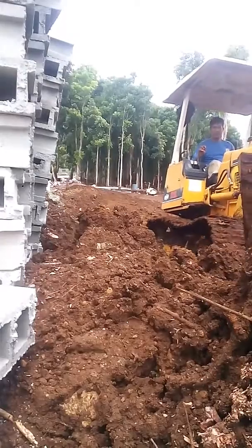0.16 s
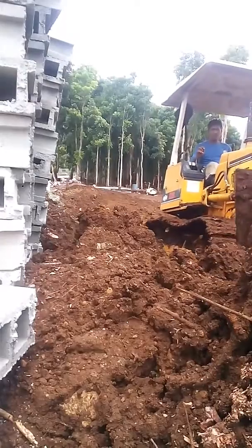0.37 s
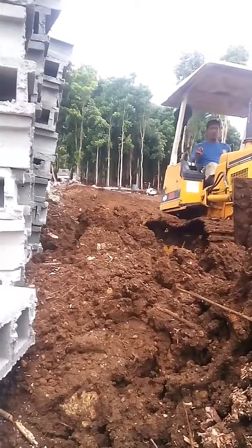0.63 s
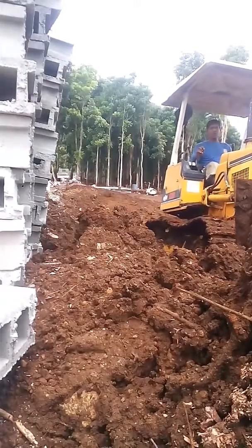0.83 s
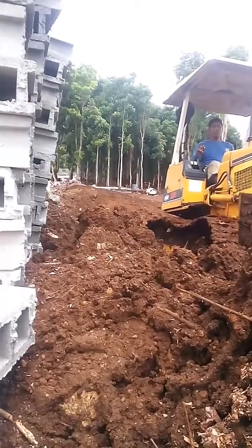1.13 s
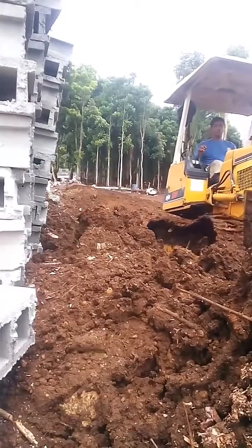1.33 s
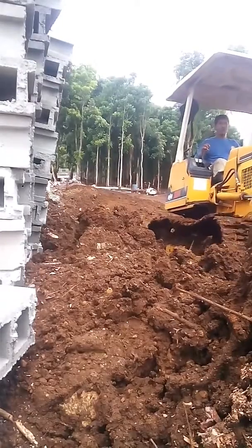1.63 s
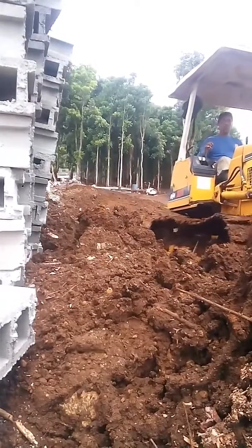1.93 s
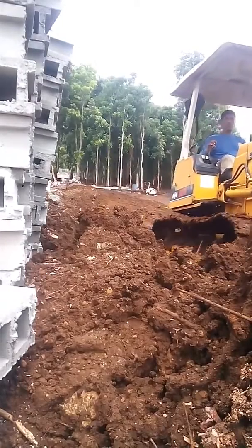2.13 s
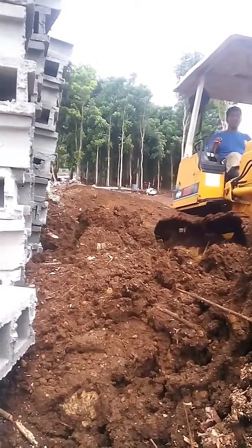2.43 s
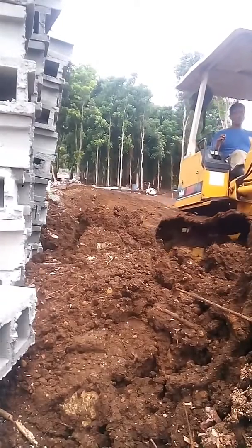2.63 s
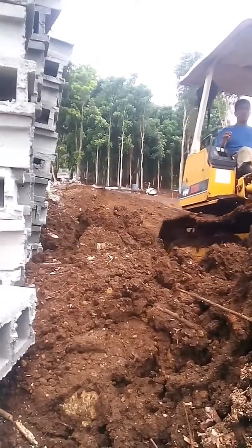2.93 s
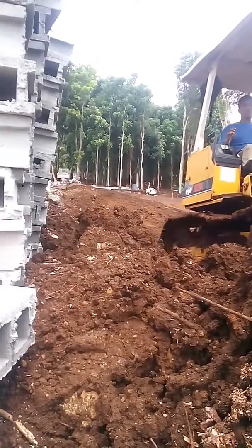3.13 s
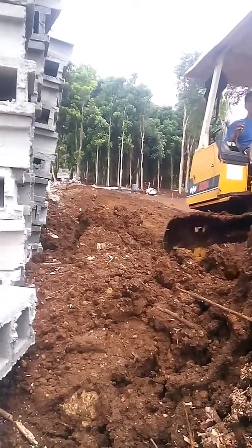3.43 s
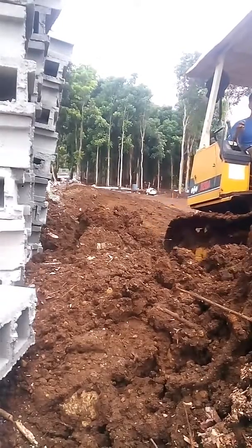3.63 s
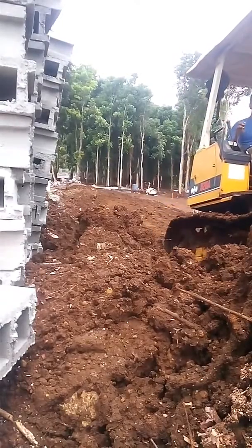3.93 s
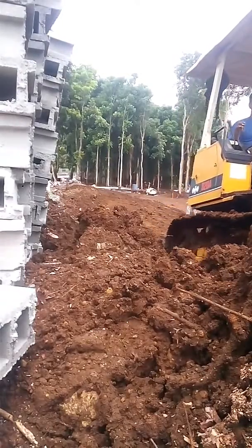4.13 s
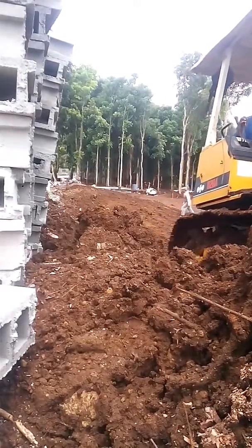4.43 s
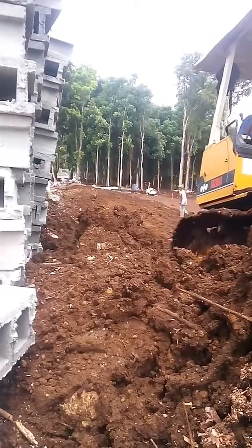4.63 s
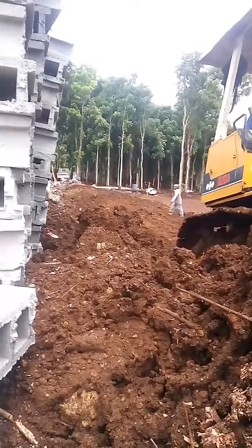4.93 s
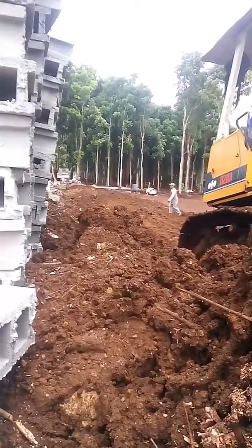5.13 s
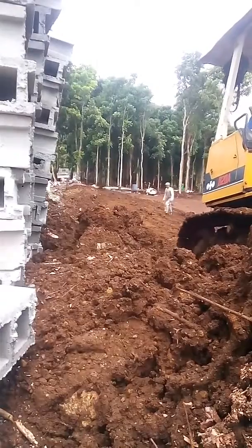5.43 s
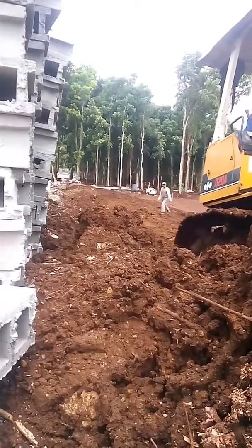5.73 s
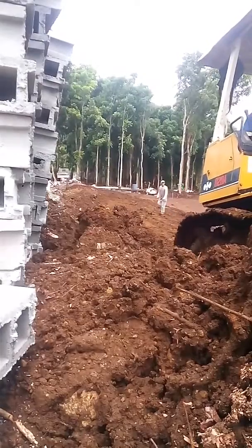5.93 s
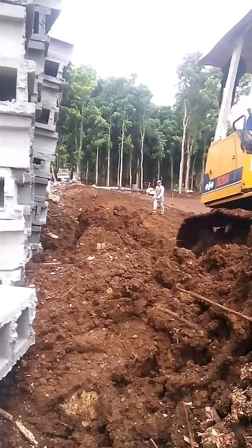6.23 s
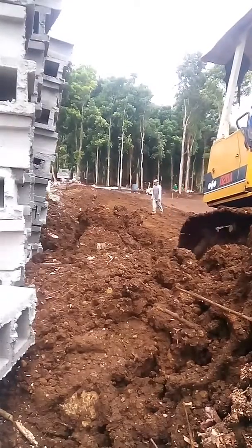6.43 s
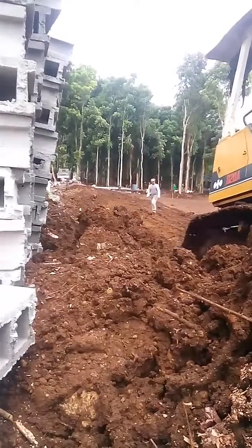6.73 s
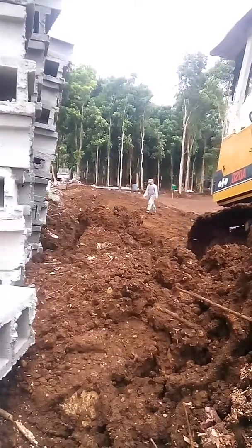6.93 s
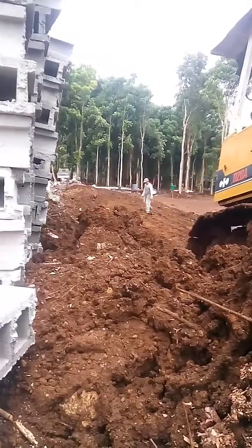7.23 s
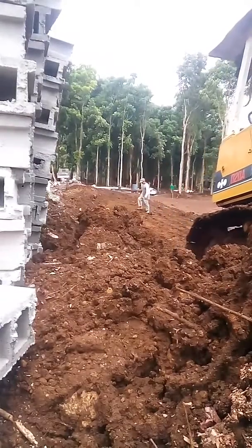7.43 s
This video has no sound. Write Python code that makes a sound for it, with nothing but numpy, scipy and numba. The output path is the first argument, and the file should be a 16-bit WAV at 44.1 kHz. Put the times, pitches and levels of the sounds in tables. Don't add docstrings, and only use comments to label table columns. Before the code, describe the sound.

Outdoors, a few metres from the microphone, a small four-cylinder crawler diesel runs without pause. A low throbbing exhaust with an uneven lope sits under knocking, rattling metal clatter. It backs closer, getting louder and brighter with more fan hiss, sagging slightly as soil loads the blade. A tight cluster of track clanks comes just before five seconds.

```python
import sys
import numpy as np
from scipy import signal
from scipy.fft import rfft, irfft, next_fast_len
from scipy.io import wavfile
from scipy.ndimage import uniform_filter1d
from numba import njit

SR = 44100
rng = np.random.default_rng(int(sys.argv[2]) if len(sys.argv) > 2 else 0)


def to_wav(s):
    ch = np.atleast_2d(s).T
    pcm = np.round(np.clip(ch, -1, 1) * 32767)
    wavfile.write(sys.argv[1], SR, pcm.astype(np.int16))


def magnitude_from_level(level_db):
    exponent = np.asarray(level_db, float) / 20
    return 10 ** exponent


N = 333837

# (time [s], firing rate [1/s])
FIRING_RATE = [(0.0, 54.88), (0.5, 54.93), (0.8, 51.26), (1.18, 53.13), (2.0, 51.28), (2.7, 52.33),
               (3.4, 51.74), (3.96, 54.94), (4.06, 54.26), (4.4, 48.84), (4.94, 53.49), (5.54, 52.64),
               (5.9, 55.31), (6.27, 50.51), (7.15, 51.87), (7.57, 57.0)]
# (time [s], effort [0-1])
EFFORT = [(0, 0.37), (.4, 0.21), (.9, 0.2), (1.6, 0.6), (2.05, 0.56), (2.4, 0.78), (2.6, 0.64), (3.1, 0.7),
          (3.5, 0.82), (4.2, 0.24), (4.5, 0.84), (4.88, 1.05), (5.06, 0.36), (5.35, 0.83), (6.02, 0.08),
          (6.5, 0.72), (6.95, 0.92), (7.57, 0.08)]
# (time [s], nearness [0-1], facing of the grille [0-1])
APPROACH = [(0, 0, .01), (1.2, 0.06, 0), (2.3, 0.31, 0), (3.3, 0.32, 0.38), (3.9, 0.39, 0.84),
            (4.6, 0.81, .9), (5.3, 0.96, 1), (6.4, 0.78, 1), (7.57, 1, 1)]
# (far and idle [dB], full effort [dB], near [dB], full strain [dB], speed [dB per firing/s])
EXHAUST_LAWS = [
    (-35, 2.5, 3.5, 2.5, 0.64),
    (-40.5, 2, 4.5, 4, 0.22),
    (-47, 17.5, 0.5, 1.8, -1),
    (-42.5, -0.5, 4.5, 1.5, 0.36),
]
USUAL_RATE = 51.5
LOUD_CYLINDER = 0.525


def unit(x):
    return x / np.sqrt(np.mean(x ** 2))


def curves(table):
    s, *columns = np.transpose(table)
    return [np.interp(np.arange(N) / SR, s, c) for c in columns]


def coloured(x, spectrum):
    hz, db = np.transpose(spectrum)
    size = next_fast_len(N)
    f = np.arange(size // 2 + 1) * SR / size + 1
    gain = magnitude_from_level(np.interp(np.log(f), np.log(hz), db))
    return unit(irfft(rfft(x, size) * gain, size)[:N])


def walk(rate):
    k = int(SR / rate)
    held = np.repeat(rng.standard_normal(N // k + 1), k)
    return unit(uniform_filter1d(uniform_filter1d(held, k), k)[:N])


@njit
def svf(x, hz, width):
    y, b, l = np.empty(len(x)), 0., 0.
    for i in range(len(x)):
        g, k = np.tan(np.pi * hz[i] / SR), width / hz[i]
        v = (b + g * (x[i] - l)) / (1 + g * (g + k))
        b, l, y[i] = 2 * v - b, l + 2 * g * v, k * v
    return y


def ring(x, modes, steep=False):
    out = 0
    for k, (hz, width, db) in enumerate(modes):
        centre = np.full(N, 1. * hz)
        y = svf(x, centre, 1. * width)
        if steep:
            y = svf(y, centre, 1. * width)
        out = out + (-1) ** k * magnitude_from_level(db) * y
    return out


def bite():
    # (time of the break [s], build-up [s], sag [firings/s])
    bites = [
        (0.93, 0.08, 0.35),
        (1.5, 0.5, 2.21),
        (2.36, 0.37, 1.67),
        (2.87, 0.5, 1.06),
        (3.36, 0.31, 1.08),
        (4.84, 0.35, 3.37),
        (5.31, 0.49, 3.06),
        (6.88, 0.15, 1.12),
    ]
    t = np.arange(N) / SR
    release = 0.08
    return sum(sag * np.interp(t, [s - length, s, s + release], [0, 1, 0]) for s, length, sag in bites)


def strain():
    lag = 0.055
    drag = bite()
    return np.roll(drag / drag.max(), int(lag * SR)) ** 2


def lugging():
    return np.clip(50.3 - curves(FIRING_RATE)[0] + bite(), 0, 1)


def levels(laws, third):
    effort, near = curves(EFFORT)[0], curves(APPROACH)[0]
    fast = curves(FIRING_RATE)[0] - bite() - USUAL_RATE
    return [far_db + effort_db * effort + near_db * near + third_db * third + fast_db * fast
            for far_db, effort_db, near_db, third_db, fast_db in laws]


def exhaust(cycles, rate):
    # (multiple of the firing rate, level [dB], lead [rad], turn of lead [rad/Hz])
    beat_orders = [(1, -17, -.1, 0), (4, 1, -2.4, -1), (5, -4, 2.9, -.55), (6, -11, -.4, -.4),
                   (8, -22, 2.0, 0), (9, -26, 1.0, 0), (12, -20, 0, 0)]
    # (frequency [Hz], level [dB])
    lope_spectrum = [(25, -43), (65, -9), (78, -32), (90, 4.5), (125, 7), (165, -2.5), (182, 8),
                     (200, -4.5), (250, -7.5), (330, -16.5), (385, -20.5), (450, -22), (480, -29)]
    # (frequency [Hz], level [dB])
    roar_spectrum = [(20, -80), (60, -30), (95, -16), (130, -4), (200, 0), (280, -5), (330, -14),
                     (400, -30), (1000, -100)]
    tone_db, second_db, bark_db, lope_db = levels(EXHAUST_LAWS, strain())
    overrun = np.clip(rate - 52.35, 0, None) * (1 - 0.49 * curves(APPROACH)[0])
    tone_db = tone_db - 2.5 * overrun
    second_db = second_db + 0.5 * overrun + 5 * lugging()
    upper_db = 10.5 * (curves(EFFORT)[0] - .5)
    slip = rate - USUAL_RATE

    firing = 8 * np.pi * cycles
    low = np.cos(2 * firing)
    second = np.cos(3 * firing + 2.6 - .75 * slip) * magnitude_from_level(.8 * walk(14))
    bark = sum(magnitude_from_level(db + 0.83 * walk(18)) * np.cos(k * firing + lead + turn * slip)
               for k, db, lead, turn in beat_orders)

    hz, db = np.transpose(lope_spectrum)
    wobble = [walk(5.3) for _ in range(3)]
    puff = 2 * np.pi * (cycles - LOUD_CYLINDER)
    lope = 0
    for n in range(2, 38):
        if n % 4 == 0:
            continue
        order_hz = n * 12.9
        order_db = np.interp(order_hz, hz, db) + upper_db * (order_hz > 160) + 1.1 * wobble[n % 3]
        pipe_lag = 1.75 * np.exp(-((order_hz - 163) / 19) ** 2)
        turn = .028 * n * (n > 10) * slip
        lope = lope + magnitude_from_level(order_db) * np.cos(n * puff - pipe_lag - turn + .28 * wobble[n % 2])

    roar = coloured(rng.standard_normal(N), roar_spectrum) * magnitude_from_level(1.8 * walk(11) + 1.1 * upper_db)
    tones = magnitude_from_level(tone_db) * unit(low) + magnitude_from_level(second_db) * unit(second) + magnitude_from_level(bark_db - 4.5) * unit(bark)
    return tones + magnitude_from_level(lope_db) * (magnitude_from_level(2.0) * unit(lope) + magnitude_from_level(-5.5) * roar)


def repeating(cycles, size=4096):
    a, b = rng.standard_normal((2, size))[:, (cycles % 1 * size).astype(int)]
    blend = 1.37 * walk(1.477)
    return unit(a * np.cos(blend) + b * np.sin(blend))


def block(cycles):
    # (far and idle [dB], full effort [dB], near [dB], facing [dB], speed [dB per firing/s])
    block_laws = [
        (-47.5, 4, 6, .1, 0.27),
        (-49, 1.2, 5.4, .1, .1),
        (-75, 4.2, 7.5, 4.46, .1),
        (-93.5, 2.5, 3, 22, .1),
    ]
    knock_db = [1.5, -6.5, -3.5, -4.5]
    # (frequency [Hz], level [dB])
    casting_spectrum = [(160, -5), (280, -10.5), (339, -13.5), (378, -4), (579, -4.5), (861, -2.5),
                        (1300, -13.5), (1710, -8), (2100, -17.5), (2760, -8), (3300, -15.5), (4340, -20),
                        (5180, -27), (6630, -26), (7400, -80), (9620, -67), (16300, -120)]
    # (frequency [Hz], width [Hz], level [dB])
    panel_modes = [(457, 36, 2), (588, 39, -6), (1142, 150, -6.5), (4260, 910, -14.5), (5745, 360, -16),
                   (6630, 110, -16)]
    # (place in the cycle [0-1], frequency [Hz], width [Hz], level [dB])
    valve_ticks = [(.2, 1850, 88, -13.5), (0.93, 5670, 800, -20.5), (.72, 2500, 160, -13.5)]
    # (frequency [Hz], level [dB])
    hiss_spectrum = [(4000, -92), (6600, -17), (7000, -8.5), (7300, -16), (7750, -12.5), (8200, -10.5),
                     (9070, -9.5), (10900, -6), (12000, -9), (12800, -15), (14000, -32), (16000, -62)]
    # (frequency [Hz], level [dB])
    top_spectrum = [(8000, -92), (11000, -39), (12400, -6), (13000, -7), (14000, -1), (14900, -6),
                    (15250, -9), (15650, -15), (15800, -56)]
    effort, facing = curves(EFFORT)[0], curves(APPROACH)[1]
    heave_db = 2 * effort ** 3 * np.cos(2 * np.pi * (cycles - LOUD_CYLINDER))
    clatter_db, cover_db, fan_db, top_db = levels(block_laws, facing) + heave_db

    firings = 4 * cycles + 4.19
    count, since = firings.astype(int), firings % 1
    scatter_db = 1.5 * rng.standard_normal(count[-1] + 1)[count]
    strength = magnitude_from_level(np.array(knock_db)[count % 4] + scatter_db)
    gate = 0.72 + strength * (since / 0.14) * np.exp(1 - since / 0.14) * 0.34
    knock = [unit(gate * rng.standard_normal(N)) for _ in range(5)]
    gear = gate * repeating(cycles)

    casting = coloured(knock[0] + 0.53 * gear, casting_spectrum) * magnitude_from_level(0.46 * walk(12))
    panels = sum(ring(knock[1] + 0.72 * gear, [mode], steep=True) * magnitude_from_level(1.7 * walk(5))
                 for mode in panel_modes)
    ticks = 0
    for place, hz, width, db in valve_ticks:
        burst = np.exp(-((cycles - place) % 1) / 0.067) * magnitude_from_level(1.4 * walk(12)) * rng.standard_normal(N)
        ticks = ticks + magnitude_from_level(db) * unit(ring(burst, [(hz, width, 0)], steep=True))
    clatter = magnitude_from_level(-1.5) * casting + magnitude_from_level(-14) * unit(panels) + magnitude_from_level(-9.5) * ticks

    cover_hz = 2667 + 80 * facing + 55.3 * 4 * strain() * effort ** 2 + 30 * walk(7)
    cover = svf(svf(knock[2] + 0.28 * gear, cover_hz, 460.0), cover_hz, 460.0)
    cover = unit(cover) * magnitude_from_level(1.8 * walk(7.9))

    jolt = walk(16)
    fan = magnitude_from_level(fan_db + 1.0 * jolt) * coloured(knock[3], hiss_spectrum)
    fan = fan + magnitude_from_level(top_db + 1.1 * jolt + 1.3 * walk(22)) * coloured(knock[4], top_spectrum)
    return magnitude_from_level(clatter_db) * clatter + magnitude_from_level(cover_db - 3.0) * cover + fan


def body(cycles):
    # (far and idle [dB], full effort [dB], near [dB], facing [dB], speed [dB per firing/s])
    body_laws = [
        (-58, 3.43, 5.2, 7.4, 0.71),
        (-56, 1.4, 3.8, 4.2, 0.2),
        (-55.5, 2, 0.53, .1, .1),
    ]
    effort, facing = curves(EFFORT)[0], curves(APPROACH)[1]
    hood_db, side_db, grille_db = (db + 1.4 * walk(9) for db in levels(body_laws, facing))
    hood_db = hood_db + 6 * lugging() * effort ** 2
    hood_hz, side_hz, grille_hz = (hz * (1 + 0.011 * walk(5)) for hz in (385.4, 866, 1807 - 90 * facing))
    shake = repeating(cycles) + 0.44 * rng.standard_normal(N)

    frame = unit(ring(shake, [(520, 100, 0)], steep=True))
    labour = uniform_filter1d(lugging(), size=SR // 6, origin=SR // 14) * effort ** 3
    pulse = 1 + 0.56 * np.cos(2 * np.pi * (cycles - LOUD_CYLINDER))
    out = magnitude_from_level(-44.5) * labour * pulse * frame
    for db, hz, width in ((hood_db - 4, hood_hz, 40.), (side_db - 3, side_hz, 100.),
                          (grille_db - 5, grille_hz, 220.)):
        out = out + magnitude_from_level(db) * unit(svf(svf(shake, hz, width), hz, width))
    return out


def whines(cycles):
    # (multiple of the cycle rate, level turned away [dB], level facing [dB])
    whine_orders = [(29, -70, -55.5), (31, -61, -65.5), (35, -64, -58), (40, -62, -73), (41, -71, -63),
                    (56, -61, -70), (64.66, -64, -56), (72.3, -71, -70), (95.7, -67.5, -85)]
    facing = np.clip(curves(APPROACH)[1], 0, 1)
    out = 0
    for order, away_db, facing_db in whine_orders:
        db = away_db + (facing_db - away_db) * facing + 3.5 + 2.3 * walk(3.03)
        out = out + magnitude_from_level(db) * np.cos(2 * np.pi * round(order) * cycles + 0.57 * walk(3.96))
    return out


def clanks():
    # (time [s], peak level [dB], frequency [Hz])
    pin_strikes = [(2.3436, -48, 2740), (3.495, -41, 2520), (4.498, -30.5, 2660), (4.756, -26.5, 2860),
                   (4.7774, -33, 2910), (4.857, -34, 2820), (4.8807, -37, 2980), (4.8976, -26.5, 2920),
                   (4.9194, -32, 2940), (5.3445, -32, 2770), (5.436, -35, 2730), (6.895, -41, 2640)]
    out, t = np.zeros(N), np.arange(int(.15 * SR)) / SR
    envelope = (1 - np.exp(-t / .002)) * np.exp(-t / .012)
    for s, db, hz in pin_strikes:
        turn = 2 * np.pi * hz * t
        partials = np.sin(turn) + 0.24 * np.sin(0.88 * turn) + 0.4 * np.sin(1.19 * turn)
        i = int(s * SR)
        out[i:i + len(t)] += magnitude_from_level(db - 2.5) * partials * envelope
    return out


def low_rumble():
    # (frequency [Hz], level [dB])
    rumble_spectrum = [(10, -36), (17, -9), (25, -4), (33, 0), (42, -20), (60, -8), (80, 2.5), (100, -21),
                       (200, -67), (400, -100)]
    lope_db = levels(EXHAUST_LAWS, strain())[3]
    return magnitude_from_level(lope_db - 19.0) * coloured(rng.standard_normal(N), rumble_spectrum)


def scene():
    rate = curves(FIRING_RATE)[0] - bite()
    cycles = -.011 + np.cumsum(rate) / SR / 4
    engine = exhaust(cycles, rate) + block(cycles) + body(cycles) + whines(cycles)
    return (engine + clanks() + low_rumble())[None]


def drop_faint(x, under_db, scatter_db):
    z = signal.stft(x, nperseg=2048, noverlap=1024, window="cosine")[2]
    bands = z[208:416].reshape(-1, 8, z.shape[1])
    budget = unit(uniform_filter1d(rng.standard_normal(bands[:, 0].shape), size=3, axis=1))
    budget = unit(uniform_filter1d(budget, size=5, axis=0))
    rattle = np.mean(abs(z[250:315]) ** 2, axis=0)
    limit = .6 * rattle * magnitude_from_level(-under_db + scatter_db * budget) ** 2
    z[208:416] = (bands * (abs(bands) ** 2 > limit[:, None])).reshape(-1, z.shape[1])
    short = unit(uniform_filter1d(rng.standard_normal(z.shape[1]), size=3)) + .7
    bins = np.arange(len(z))[:, None]
    notch = abs(bins - 352) < 12 * np.clip(short, 0, 1.5)
    z[notch | ((bins > 707) & (short > 0))] = 0
    return signal.istft(z, nperseg=2048, noverlap=1024, window="cosine")[1][:N]


def low_pass(x):
    return signal.sosfilt(signal.butter(12, 15750, fs=SR, output="sos"), x)


def record(dry):
    fade = 0.004
    n = np.arange(N)
    edge = np.clip(np.minimum(n, n[::-1]) / (fade * SR), 0, 1)
    mix = drop_faint(dry[0] * edge, under_db=9.3, scatter_db=3)
    return low_pass(mix[None])


dry = scene()
out = record(dry)
to_wav(out)
```